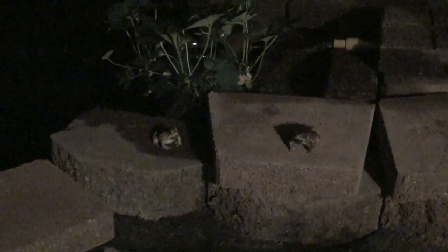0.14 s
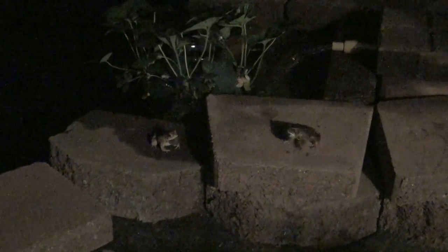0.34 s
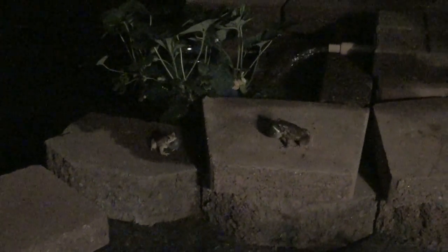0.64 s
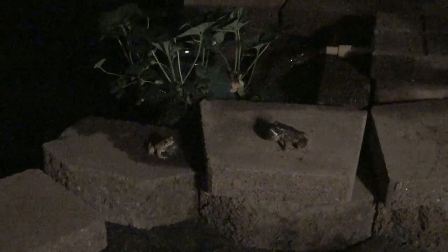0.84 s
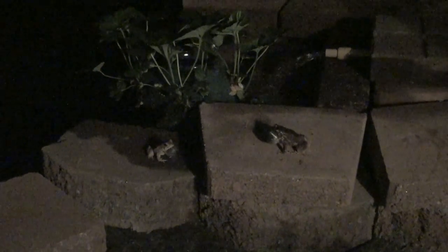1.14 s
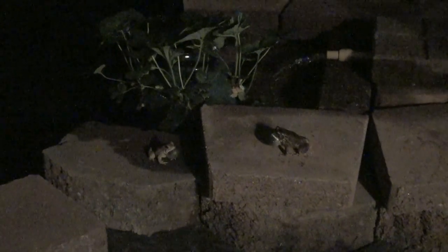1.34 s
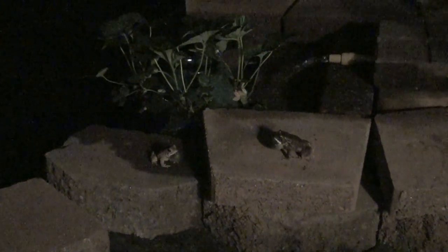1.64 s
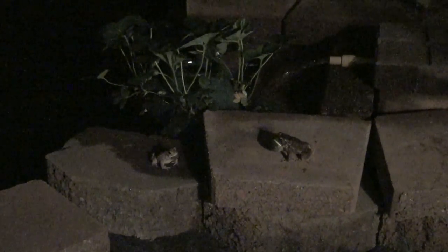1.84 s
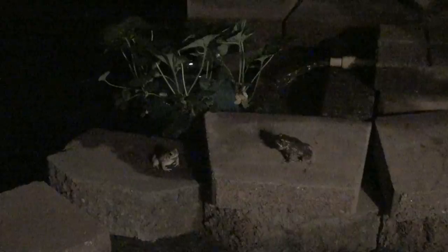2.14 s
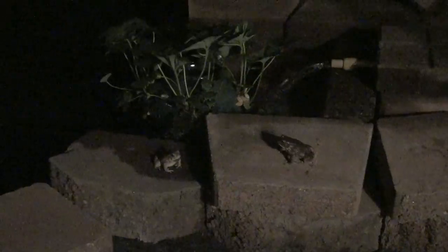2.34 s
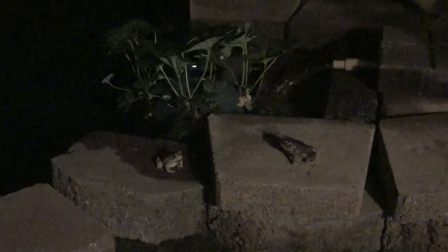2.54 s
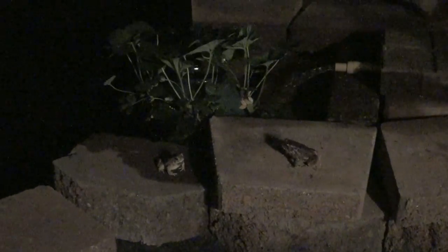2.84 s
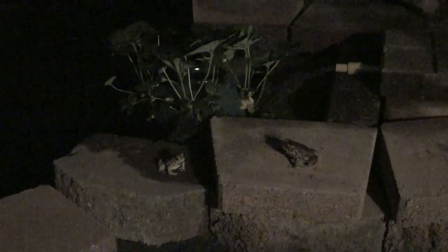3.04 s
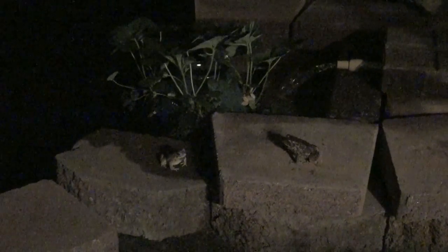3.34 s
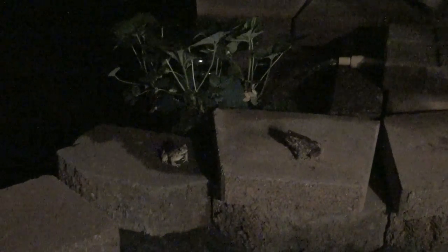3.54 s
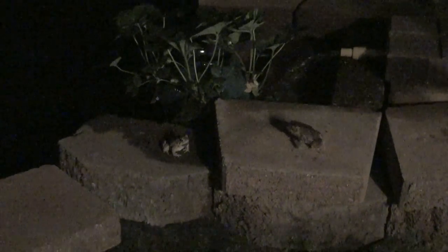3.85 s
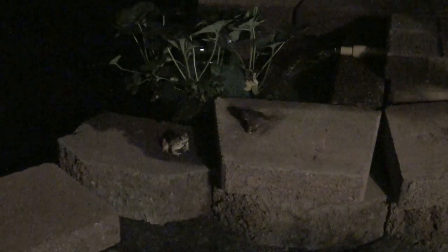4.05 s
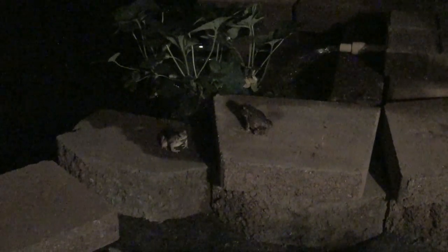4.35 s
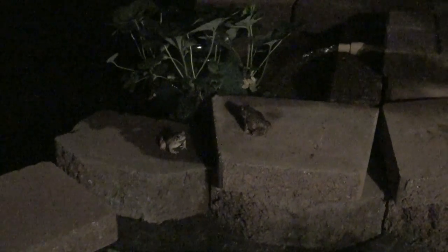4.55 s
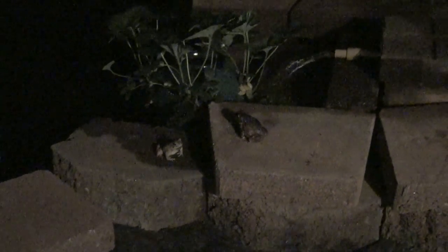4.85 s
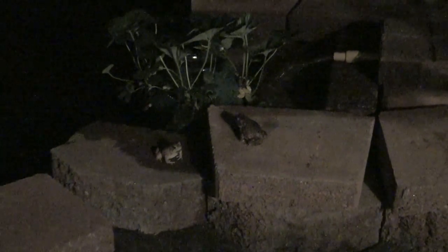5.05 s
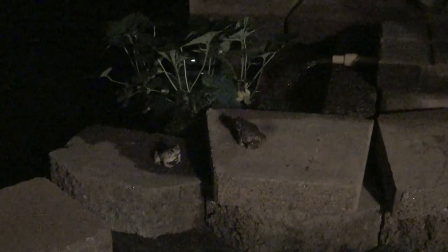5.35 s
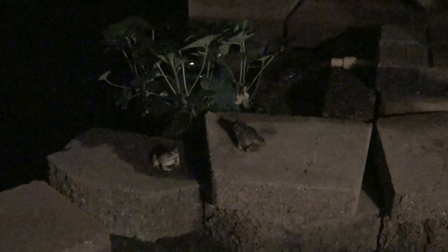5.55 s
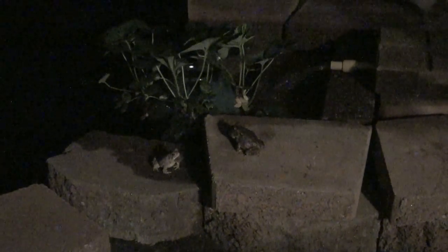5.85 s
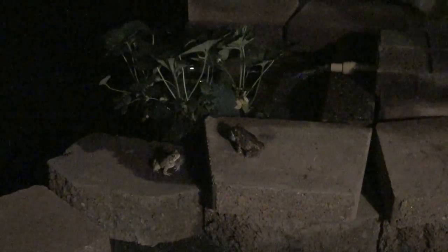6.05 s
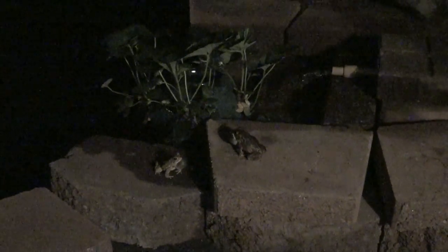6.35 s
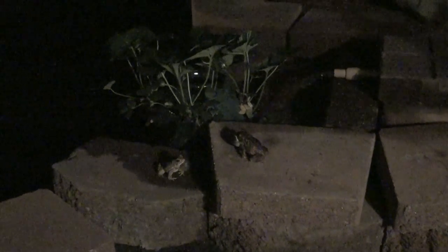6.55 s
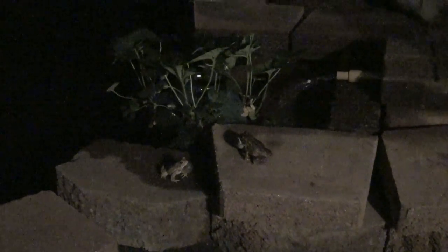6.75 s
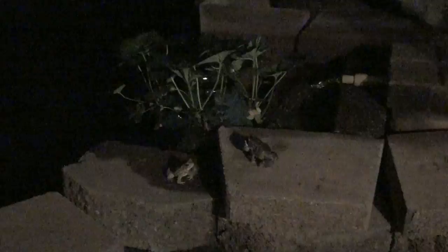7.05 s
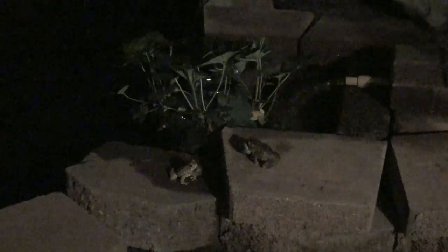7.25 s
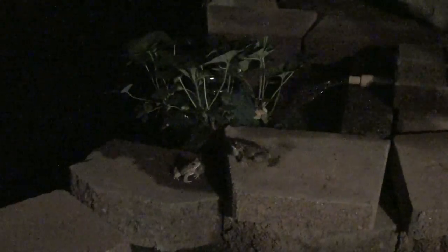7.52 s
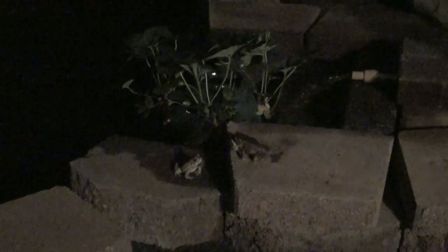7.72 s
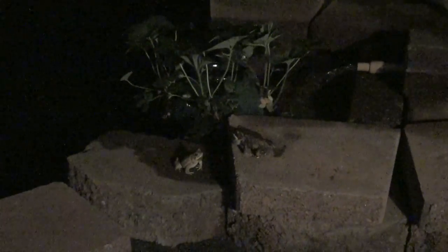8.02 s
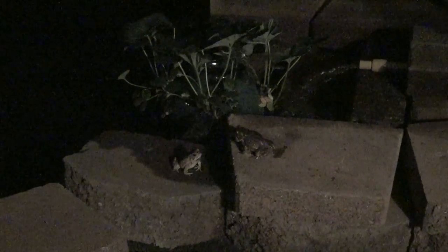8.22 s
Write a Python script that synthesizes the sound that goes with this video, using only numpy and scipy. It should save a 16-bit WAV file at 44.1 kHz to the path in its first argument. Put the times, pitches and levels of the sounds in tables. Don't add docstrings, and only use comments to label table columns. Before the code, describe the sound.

Loud, high, buzzing toad trills in overlapping pairs, slightly distorted and echoing off garden stones, with faint drips, spatter and crickets in the pauses.

```python
import sys
import numpy as np
from scipy import signal
from scipy.io import wavfile
from scipy.ndimage import uniform_filter1d, minimum_filter1d

SR = 44100
rng = np.random.default_rng(int(sys.argv[2]) if len(sys.argv) > 2 else 0)


def gain_from_db(level_db):
    decades = np.asarray(level_db, float) / 20
    return 10 ** decades


def pcm_store(signal):
    levels = np.round(np.clip(np.atleast_2d(signal), -1, 1) * 32767)
    wavfile.write(sys.argv[1], SR, levels.astype(np.int16).T)


N = 369558

# (time [s], pulse rate [Hz], level [dB])
HIGH_TRILLS = [
    [(.288, 113.8, -30), (.32, 120, -25.5), (.36, 125.6, -13.5), (.42, 133.7, -5), (.53, 142.9, -5),
     (.65, 141.4, -9), (1.0, 135.1, -9), (1.6, 129.6, -8.5), (1.735, 124.5, -9)],
    [(5.787, 111.7, -23), (5.88, 120.8, -19), (6.0, 134.9, -5), (6.08, 142.3, -4.5), (6.14, 140.2, -8.5),
     (6.27, 140.7, -8.5), (6.63, 133.7, -8), (7.3, 128.9, -9), (7.705, 124.9, -11)],
]
LOW_TRILLS = [
    [(.358, 127.4, -23), (.4, 145.6, -17), (.45, 152.9, -9), (.53, 164, -8.5), (.72, 162.2, -12.5),
     (1.16, 154.1, -11), (1.8, 148.5, -11.5), (1.97, 146, -10), (2.068, 137.2, -7.5)],
    [(5.917, 128.8, -27), (5.96, 142, -18.5), (6.0, 153.3, -11.5), (6.1, 163.5, -16), (6.19, 162, -10.5),
     (6.3, 162.4, -16), (6.5, 157, -12.5), (7.3, 148.7, -13), (8.1, 144, -14.5)],
]
LONE_TRILL = [(3.657, 117.8, -38), (3.7, 125.9, -27), (3.75, 146, -19.5), (3.775, 150.6, -16),
              (3.82, 151.1, -12), (3.88, 146.8, -8), (4.12, 146.8, -11.5), (4.28, 147, -13),
              (4.828, 138.2, -11)]
# (time [s], pulse rate [Hz], level [dB])
SQUEAK_CURVE = [(5.87, 121.2, -41.5), (5.92, 125.5, -33), (5.95, 129, -29.5), (5.99, 141, -42.5)]
# (time [s], pulse rate [Hz], level [dB])
GRUNT_CURVE = [(5.912, 121, -36), (5.94, 129, -41), (5.99, 130.6, -41)]
# (cycles per pulse, held note [Hz], drift [Hz/s])
HIGH_SAC_NOTE = (14.44, 2137, -50.5)
LOW_SAC_NOTE = (11.15, 1880, 8.3)
LONE_SAC_NOTE = (12.2, 2016, -54.5)
SQUEAK_NOTE = (21.2, 2900, 0)
GRUNT_NOTE = (7.0, 900, 0)
# (ring filling [ms], ring held [ms], roughness filling [0-1], roughness held [0-1])
HIGH_PULSE_SHAPE = (.85, .5, .015, .05)
LOW_PULSE_SHAPE = (.85, .45, .025, .04)
LONE_PULSE_SHAPE = (.6, .5, .07, .055)
SQUEAK_PULSE_SHAPE = (.78, .78, .025, .025)
# (multiple, level [dB], highest pitch [Hz])
HIGH_PARTIALS = [(1.97, -34, 4025), (2.9, -43.5, 6300)]
LOW_PARTIALS = [(1.97, -30, 3500), (2.9, -36.5, 5430)]
LONE_PARTIALS = [(1.97, -31.5, 3825), (2.5, -45.5, 4910), (3.0, -36.5, 5980)]
# (pitch [Hz], ring [ms], level [dB])
HIGH_KNOCKS = [(1550, 0.89, -34), (3000, 0.23, -33.5)]
LOW_KNOCKS = [(1397, 1, -29.5), (2340, 0.27, -25)]
LONE_KNOCKS = [(1314, 0.65, -30), (2600, 0.21, -22)]
# (middle [s], half length [s], longer ring [ms], extra roughness [0-1])
VOICE_SLIPS = [
    (3.72, .06, -.05, .12),
    (4.32, .12, .3, .1),
    (.65, .05, 0, .07),
    (5.83, .075, .55, -.03),
    (6.22, .06, 0, .06),
]
# (delay [ms], left [dB], right [dB])
WALL_ECHOES = [(1.7, -29.5, -16.5), (4.3, -33.5, -8.5), (9.5, -18.5, -16), (17, -11.5, -13.5)]
# (time [s], peak [dB], pitch [Hz], pan [dB])
HOSE_DROPS = [
    [(0.1526, -32, 6000, 4), (0.2074, -31.5, 3080, -6), (0.2448, -34.5, 3080, -3)],
    [(2.1144, -29, 3360, -6.5), (2.5167, -40.5, 3080, -10), (2.6569, -36.5, 2980, -5),
     (8.1354, -30.5, 3350, 0.5)],
    [(2.5381, -27, 5200, 5.5), (2.7112, -30.5, 6000, 1), (3.6017, -33.5, 5800, 4.5)],
    [(2.725, -31.5, 1970, 0.5), (2.953, -33, 1350, -13.5), (3.157, -36, 1600, -4), (3.218, -34, 690, -0.5),
     (5.746, -49.5, 600, 7), (5.75, -38, 1770, -1), (5.795, -26, 2230, -0.5)],
    [(5.0903, -31.5, 2510, 14.5), (5.4879, -36, 3180, -5.5), (5.7718, -33, 2570, 4),
     (5.8396, -31.5, 3040, 2)],
]
# (start [s], end [s], level [dB])
CRICKET_BOUTS = [(0, .21, -53), (0.414, 1.05, -60), (1.2, 1.853, -62.5), (1.989, 2.623, -59.5),
                 (2.77, 3.403, -54.5), (3.52, 4.148, -52), (4.3, 4.905, -53), (5.003, 5.127, -52.5),
                 (5.233, 5.844, -53.5), (6.004, 6.61, -51.5), (6.75, 7.408, -50), (7.529, 8.381, -57)]
# (time [s], level [dB])
NIGHT_LEVEL = [(0.0, -47), (0.44, -45), (0.47, -49), (2.398, -51.5), (3.62, -46), (5.801, -47), (6.14, -49),
               (8.38, -49)]
# (frequency [Hz], density [dB/Hz])
TRAFFIC_SPECTRUM = [(15, -41), (25, 1), (54, -26.5), (102, 7), (134, -2.5), (300, -8.5), (350, -10.5),
                    (401, -7.5), (743, -8), (977, -8), (1290, -18.5), (1400, -17.5), (1500, -34.5),
                    (1950, -44), (3300, -120)]
# (frequency [Hz], density [dB/Hz])
AIR_SPECTRUM = [(1200, -8.5), (1500, -11), (2500, -7), (3600, -14.5), (4400, -2.5), (5000, -4.5),
                (5800, -22), (9000, -14), (13000, -23), (15600, -25.5)]
# (frequency [Hz], left-right likeness [0-1])
STEREO_LIKENESS = [(60, 1.0), (180, 1), (550, 0.83), (1650, 0.87), (4970, 0.71), (15000, 0.85)]
# (frequency [Hz], left minus right [dB])
STEREO_LEAN = [(60, -0.5), (240, 0.5), (950, -2), (3770, 0.5), (15000, 1)]


def rms_one(x):
    return x / np.sqrt(np.mean(x ** 2) + 1e-20)


def at_hz(points, hz):
    points_hz, values = np.transpose(points)
    return np.interp(np.log(hz), np.log(points_hz), values)


def drift(rate):
    knots = rng.standard_normal(2000)
    return np.interp(np.arange(N) / SR * rate, np.arange(2000), knots) * np.sqrt(1.5)


def panned(x, pan_db):
    return x * gain_from_db([[pan_db / 2], [-pan_db / 2]])


def ring(clicks, hz, t60):
    r, w = gain_from_db(-60 / (t60 * SR)), 2 * np.pi * hz / SR
    return signal.lfilter([0, np.sin(w)], [1, -2 * r * np.cos(w), r * r], clicks + 1e-18)


def sac_overtones(age, hz, swell, rate, level_db, overtones):
    out = np.zeros_like(age)
    slack = np.clip(1 - rate / rate.max() - .1, 0, 1)
    for multiple, db, top_hz in overtones:
        octave_db = (30 * slack - .8 * (level_db + 11)) * (multiple < 2.25)
        tone = np.sin(2 * np.pi * np.minimum(multiple * hz, top_hz) * age)
        out += gain_from_db(db + octave_db) * tone * swell ** 1.4
    return out


def throat_knocks(age, since, throat):
    out = np.zeros_like(age)
    rasp = np.minimum(0.17 + since / 0.55, 1) + 3 * np.exp(-since / 0.043)
    for hz, ring_ms, db in throat:
        v = age / ring_ms * 1000
        out += gain_from_db(db + 24) * rasp * v * np.exp(-v) * np.sin(2 * np.pi * hz * age)
    return out


def toad_call(curve, sac, pulse, overtones, throat, edge_hz=2290):
    settle_s = 0.056
    slack_share, slack_s = .02, .04
    waver_per_s, waver_ring, waver_hz = 5, .08, 10
    falter_db = 7

    s, rate_points, level_points = np.transpose(curve)
    t = np.arange(round(s[0] * SR), round(s[-1] * SR)) / SR
    turns = np.cumsum(np.interp(t, s, rate_points)) / SR
    born = np.interp(np.arange(int(turns[-1])), turns, t)[:, None]
    born_at = (born[:, 0] * SR).astype(int)
    rate = np.interp(born, s, rate_points)
    level_db = np.interp(born, s, level_points)
    since = born - s[0]
    full = born - s[np.argmax(rate_points)]
    held = np.clip(full / settle_s, 0, 1)

    fill_ring, held_ring, fill_rough, held_rough = pulse
    ring_ms = (1 - held) * fill_ring + held * held_ring
    ring_ms = ring_ms * (1 + waver_ring * held * drift(waver_per_s)[born_at, None])
    usual_rough = (1 - held) * fill_rough + held * held_rough
    rough = usual_rough
    for middle, half, longer_ms, ragged in VOICE_SLIPS:
        slip = np.exp(-((born - middle) / half) ** 4)
        ring_ms = ring_ms + longer_ms * slip
        rough = rough + ragged * slip

    cycles, held_hz, drift_hz = sac
    filling_hz = rate * cycles * (1 - slack_share * np.exp(-since / slack_s))
    steady_hz = held_hz + waver_hz * drift(waver_per_s)[born_at, None] + drift_hz * full
    sac_hz = (1 - held) * filling_hz + held * steady_hz
    luck = rng.standard_normal((3, len(born), 1)) * np.clip(rough, 0, 1)
    hz = sac_hz * (1 + .03 * luck[0])
    start = born + 1.67 * luck[1] / hz
    samples = np.floor(start * SR) + np.arange(1, 900)
    age = samples / SR - start

    u = age / np.clip(ring_ms, .2, 2.5) * 1170
    swell = u ** 8 * np.exp(-u)
    swell /= np.sqrt(np.sum(swell ** 2, axis=1, keepdims=True) * rate / SR / 2)
    note = np.sin(2 * np.pi * hz * age) * swell
    colour = sac_overtones(age, hz, swell, rate, level_db, overtones) + throat_knocks(age, since, throat)

    spread_db = 6 + falter_db * (rough > usual_rough + .02)
    gain = gain_from_db(level_db + spread_db * luck[2])
    at = samples.astype(int).ravel()
    note = np.bincount(at, (gain * note).ravel(), N + 900)[:N]
    colour = np.bincount(at, (gain * colour).ravel(), N + 900)[:N]
    return signal.sosfilt(signal.butter(8, edge_hz, fs=SR, output="sos"), note + 1e-18) + colour


def yard(x):
    patio_t60_s, patio_db = .25, 15
    yard_t60_s, yard_db = 1.4, -19.5
    age = np.arange(SR) / SR
    decay = gain_from_db(-60 * age / yard_t60_s) + gain_from_db(patio_db - 60 * age / patio_t60_s)
    tail = rng.standard_normal((2, SR)) * decay
    tail[:, :int(.02 * SR)] = 0
    response = gain_from_db(yard_db) * tail / np.sqrt(np.sum(tail ** 2, axis=1, keepdims=True))
    for ms, left_db, right_db in WALL_ECHOES:
        response[:, int(ms * SR / 1000)] += gain_from_db([left_db, right_db])
    return signal.fftconvolve(x[None], response, axes=1)[:, :N]


def toads():
    high = sum(toad_call(curve, HIGH_SAC_NOTE, HIGH_PULSE_SHAPE, HIGH_PARTIALS, HIGH_KNOCKS)
               for curve in HIGH_TRILLS)
    high = high + toad_call(SQUEAK_CURVE, SQUEAK_NOTE, SQUEAK_PULSE_SHAPE, [], [], edge_hz=3200)
    high = high + toad_call(GRUNT_CURVE, GRUNT_NOTE, HIGH_PULSE_SHAPE, [], [])
    low = sum(toad_call(curve, LOW_SAC_NOTE, LOW_PULSE_SHAPE, LOW_PARTIALS, LOW_KNOCKS)
              for curve in LOW_TRILLS)
    lone = toad_call(LONE_TRILL, LONE_SAC_NOTE, LONE_PULSE_SHAPE, LONE_PARTIALS, LONE_KNOCKS)
    direct = panned(high, -2.4) + panned(low, -3.0) + panned(lone, -3.5)
    return direct + yard(high + low + lone)


def drops():
    out, age = np.zeros((2, N + 2000)), np.arange(2000) / SR
    for s, peak_db, hz, pan_db in sum(HOSE_DROPS, []):
        bubble = np.sin(2 * np.pi * hz * age * (1 + 4 * age))
        bubble *= gain_from_db(-60 * age * hz / 45) * np.minimum(age / 0.00029, 1)
        tick = .12 * rng.standard_normal(2000) * gain_from_db(-60 * age / 0.0036)
        at = round(s * SR)
        out[:, at:at + 2000] += panned(gain_from_db(peak_db + 2.0) * (bubble + tick), pan_db)
    return out[:, :N]


def spatter():
    per_s, level_db = 140, -2.4
    sizes = gain_from_db(4 * np.minimum(rng.exponential(1, N), 3)) * rng.choice([-1, 1], N)
    ticks = sizes * (rng.random(N) < per_s * gain_from_db(4 * drift(25)) / SR)
    dealt = rng.integers(0, 12, N)
    pitches, pans = np.geomspace(2600, 14000, 12), rng.normal(-1.5, 1.3, 12)
    out = 0
    for k, hz in enumerate(pitches):
        share = (dealt == k) + 0.34 * (abs(dealt - k) < 4)
        out = out + panned(ring(ticks * share, hz, 44.0 / hz), pans[k])
    return gain_from_db(level_db) * rms_one(out)


def near_cricket():
    t = np.arange(N) / SR
    bouts = sum(gain_from_db(db) * (t > start) * (t < end) for start, end, db in CRICKET_BOUTS)
    beat = np.cumsum(32.3 + .5 * drift(3)) / SR
    pulses = np.clip(np.sin(2 * np.pi * beat) + .6, 0, 1)
    note = np.sin(2 * np.pi * np.cumsum(5230 + 28 * drift(60)) / SR)
    return panned(bouts * rms_one(pulses * note), -1.5)


def far_cricket():
    band = rms_one(ring(ring(rng.standard_normal((2, N)), 4660, .02), 4660, .02))
    note = np.sin(2 * np.pi * np.cumsum(4665 + 20 * drift(40)) / SR)
    throb = 1 + 0.93 * np.sin(2 * np.pi * np.cumsum(31 + 2.5 * drift(2.4)) / SR)
    return gain_from_db(-54.5 + 0.87 * drift(8.2)) * (.6 * band + 1.1 * note) * throb


def banded_noise(spectrum, patchy_db):
    bottom, top = spectrum[0][0], spectrum[-1][0]
    edges = np.geomspace(bottom, top, int(3 * np.log2(top / bottom)))
    out, white = 0, rng.standard_normal((2, 2, N))
    for k, (low, high) in enumerate(zip(edges, edges[1:])):
        band = signal.butter(2, [low, high], "band", fs=SR, output="sos")
        mid, side = signal.sosfilt(band, white[k % 2])
        hz = np.sqrt(low * high)
        alike = np.clip(at_hz(STEREO_LIKENESS, hz), 0, 1)
        pair = np.sqrt(1 + alike) * mid + np.sqrt(1 - alike) * side * [[1], [-1]]
        level = gain_from_db(at_hz(spectrum, hz) + patchy_db * drift(5.9))
        out = out + level * panned(pair, at_hz(STEREO_LEAN, hz))
    return rms_one(out)


def traffic(night):
    return gain_from_db(4.5) * night * banded_noise(TRAFFIC_SPECTRUM, patchy_db=2.0)


def night_air(night):
    return gain_from_db(-49) * (night / night.mean()) ** .4 * banded_noise(AIR_SPECTRUM, patchy_db=1.5)


def scene():
    s, level_db = np.transpose(NIGHT_LEVEL)
    night = gain_from_db(np.interp(np.arange(N) / SR, s, level_db))
    water = drops() + night * spatter()
    return toads() + water + near_cricket() + far_cricket() + traffic(night) + night_air(night)


def low_pass(x):
    return signal.sosfilt(signal.butter(12, 15660, fs=SR, output="sos"), x)


def record(dry):
    peak = -minimum_filter1d(-np.abs(dry).max(axis=0), size=500)
    peak_db = 20 * np.log10(uniform_filter1d(peak, size=500) + 1e-9)
    over_db = np.maximum(peak_db - 0.3, 0)
    evened = dry * gain_from_db(1.04 - over_db * 0.63)
    ceiling, knee = 1.02, 24.0
    mix = evened / (1 + np.abs(evened / ceiling) ** knee) ** (1 / knee)
    return low_pass(mix)


dry = scene()
out = record(dry)
pcm_store(out)
```